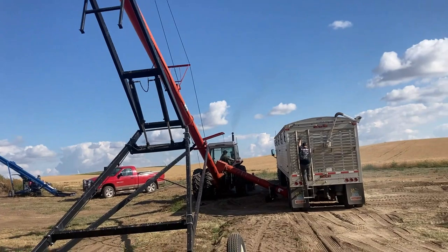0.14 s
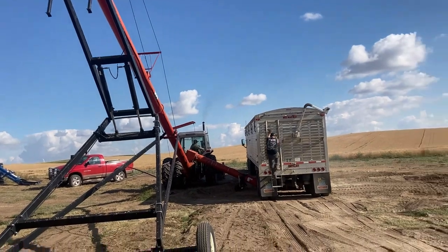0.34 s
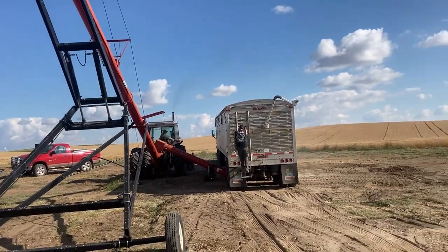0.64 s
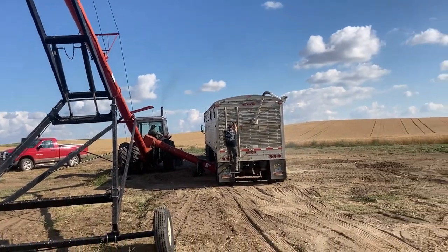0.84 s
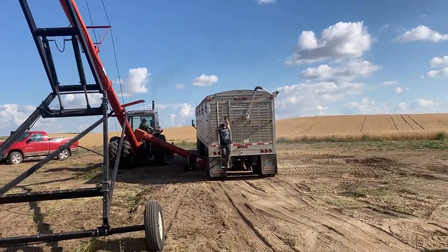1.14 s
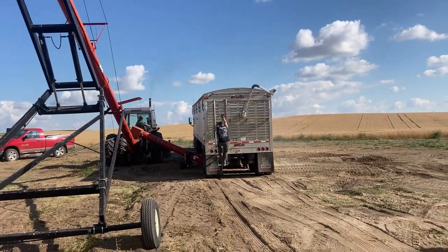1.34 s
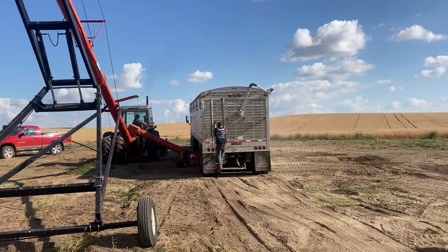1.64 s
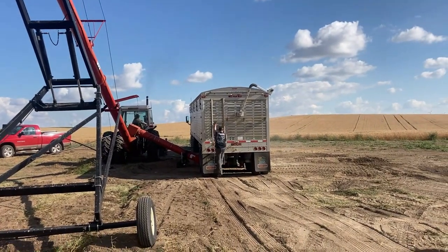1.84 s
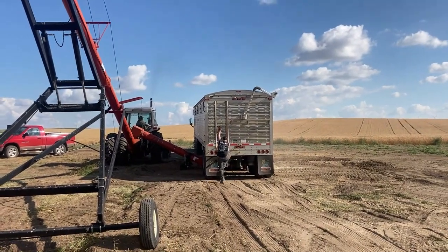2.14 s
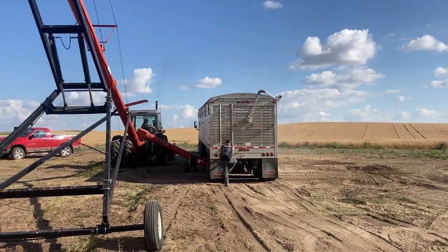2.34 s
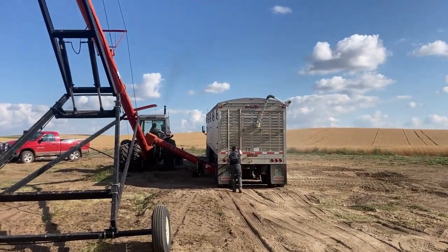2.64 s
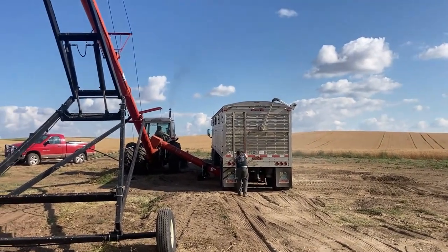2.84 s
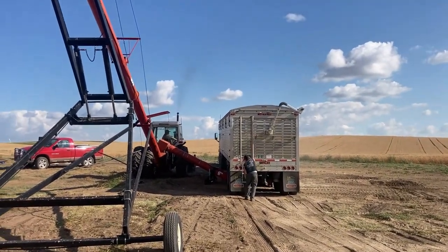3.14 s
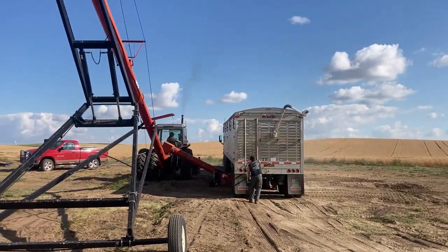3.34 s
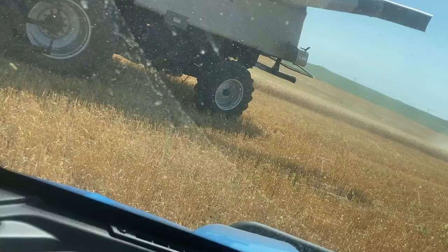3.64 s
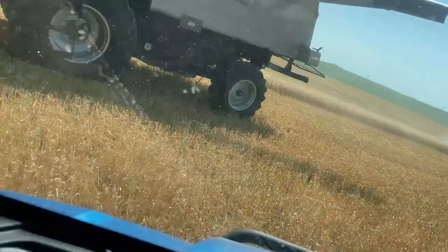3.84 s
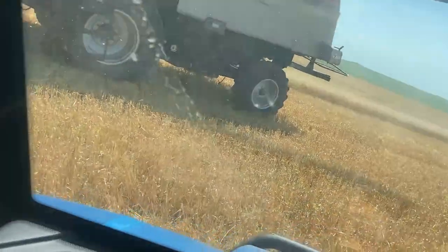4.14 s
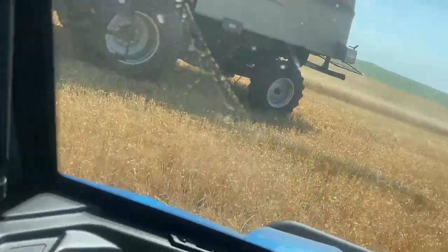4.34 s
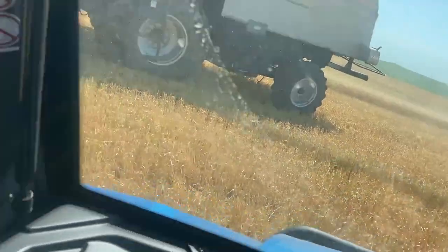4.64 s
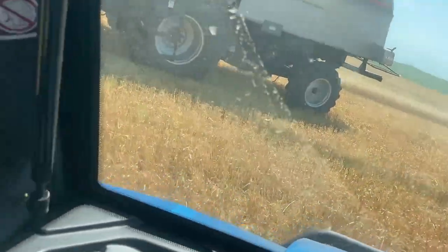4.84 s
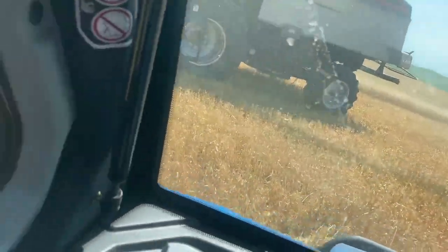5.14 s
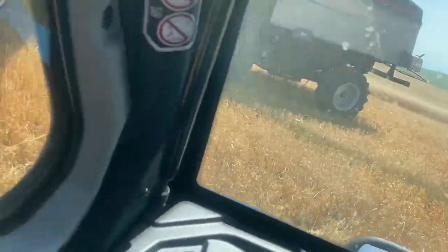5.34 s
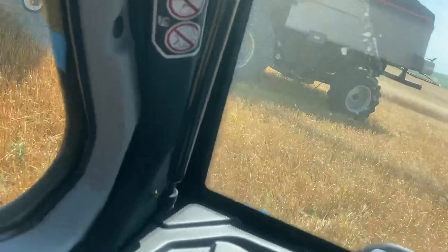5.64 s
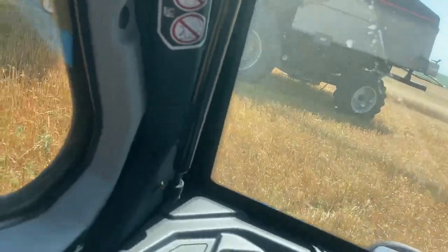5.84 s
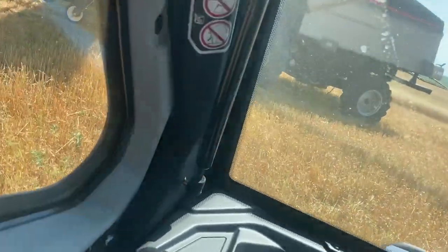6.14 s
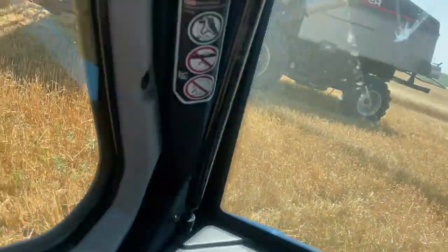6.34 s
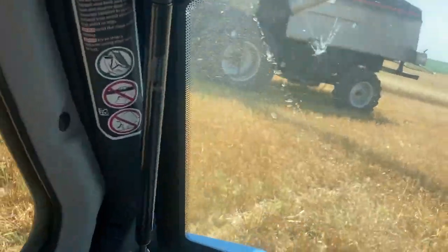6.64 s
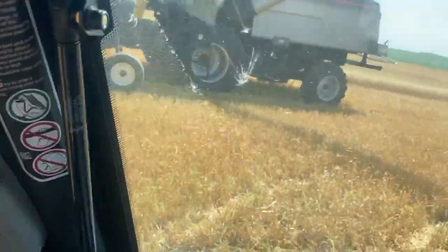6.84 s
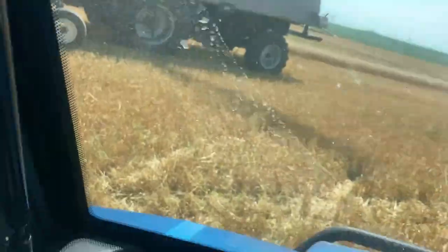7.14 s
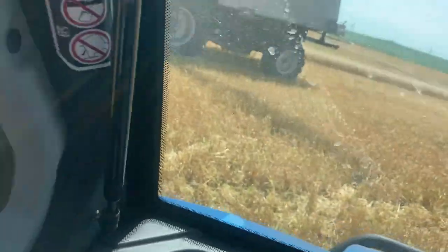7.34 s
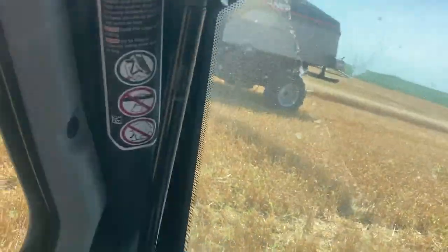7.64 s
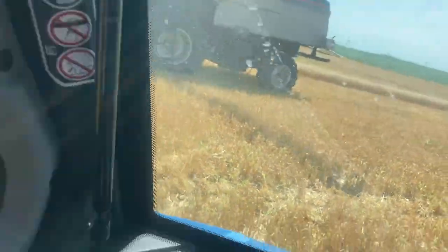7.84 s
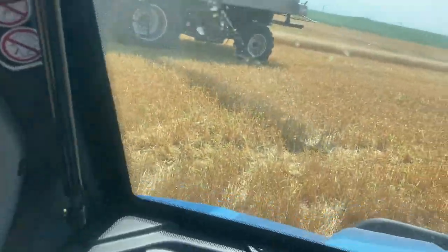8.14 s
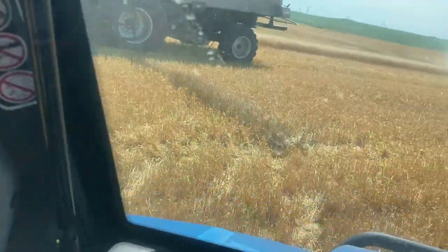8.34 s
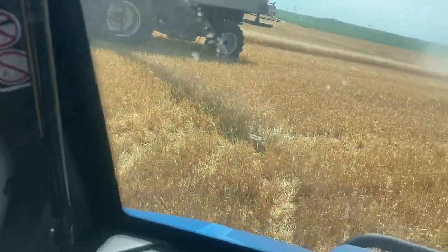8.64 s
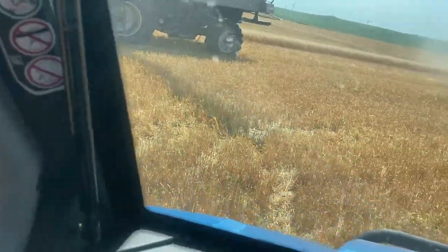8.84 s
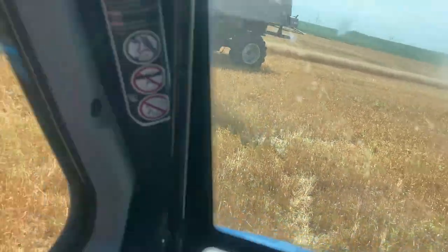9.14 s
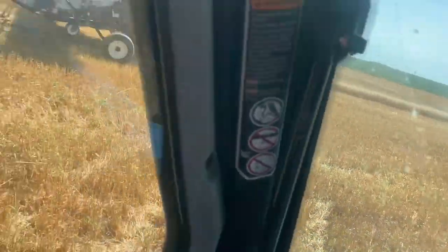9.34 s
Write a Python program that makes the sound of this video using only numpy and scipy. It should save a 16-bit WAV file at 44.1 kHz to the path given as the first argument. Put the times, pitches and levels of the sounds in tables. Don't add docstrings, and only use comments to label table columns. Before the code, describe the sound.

From 0 to about 3.7 seconds, an open farmyard: a low tractor exhaust drone with a second motor beating slowly against it, faint gear whine, and a steady broad machine roar. In front, an auger knocks about seven and a half times a second, each turn a gritty scrape and rattle of grain in a ringing steel tube. It thins near 1.7, surges at 2.0 and strengthens again before the cut. At 3.7 it switches instantly to a closed cab: a deep, bassy engine throb booms and wavers with bumps, racing most around 6.7. The harvester's steady hum grows until about 4.7 and stays, under muffled roar and faint passing whines. Light rattle at 8.0, small ticks and a faint rattle at 8.4, sharper tick at 8.7, then from 9 dust brightens the hiss, with a tick and louder trim rattles at 9.1 and another rattle at 9.4.

```python
import sys
import numpy as np
from scipy import signal
from scipy.fft import rfft, irfft, next_fast_len
from scipy.io import wavfile
from scipy.ndimage import uniform_filter1d

SR = 44100
rng = np.random.default_rng(int(sys.argv[2]) if len(sys.argv) > 2 else 0)


def boost_factor(decibels):
    exponent = np.asarray(decibels, float) / 20
    return 10 ** exponent


def dump(signal):
    limited = np.clip(np.atleast_2d(signal).T, -1, 1)
    pcm = np.round(limited * 32767).astype(np.int16)
    wavfile.write(sys.argv[1], SR, pcm)


N = 418950
T = np.arange(N) / SR
CUT_S = 3.677

# pitch_hz, level_db_rms
YARD_TONES = [(70.1, -30.5), (140.3, -29), (144.5, -33), (280.5, -37), (289.1, -51)]
BEAT_PEAK_S = 1.09
# pitch_hz, level_db_rms
GEAR_WHINE = [(1964, -52), (2557, -62)]
SHAFT = [(5, -62), (7, -53), (8, -40), (9, -41), (10, -53), (11, -49), (17, -41), (20, -41), (22, -42),
         (31, -58)]
TURN_HZ, FIRST_TURN_S, TURN_JITTER_S = 7.505, .069, 0.0042
TURN_DB, TURN_SPREAD_DB = -17.5, 1
# centre_s, extra_db
LOADS = [
    (.6, 2),
    (.86, -2.5),
    (1.54, 1),
    (1.73, -7),
    (2.0, 3.5),
    (2.87, 0.5),
    (3.06, -2),
    (3.54, 2.5),
    (3.66, 2.5),
]
LOAD_WIDTH_S = 0.1
# freq_hz, level_db_per_hz
SCRAPE = [(120, -61), (280, -57), (600, -59), (1300, -61), (2000, -62), (2800, -72), (5000, -70.5),
          (9000, -79), (15000, -83)]
# mode_hz, width_hz, gain_db
TUBE = [(242, 4.3, 3.5), (273, 30, 1.5), (305, 11, 3), (417, 49, 3.5), (490, 39, 3), (517, 28, 1),
        (603, 54, 1.5), (700, 22, 2), (1077, 126, 5), (1253, 115, 3), (1516, 180, 3.5), (2050, 45, 2),
        (4200, 1160, 1.5)]
# freq_hz, level_db_per_hz
YARD_ROAR = [(22, -72), (35, -53.5), (60, -47.5), (100, -54), (160, -48.5), (210, -55), (290, -51),
             (370, -58), (700, -56.5), (900, -62.5), (2100, -64), (2800, -69), (8500, -72), (15000, -74)]
# freq_hz, left_right_likeness, right_lead_rad
YARD_IMAGE = [(40, .9, .2), (170, .98, .1), (340, .92, -.45), (520, .85, -.8), (1300, .75, -1.2),
              (1800, .55, -2.1), (2300, .15, -2.9), (3100, .25, -4.4), (4400, .45, -6.2), (5400, .4, -8.7)]
# freq_hz, left_right_likeness, right_lead_rad
CENTRE = [(20, 1, 0), (6000, 1, -.8)]

# time_s, cycle_rate_hz
SPEED = [(3.7, 17.7), (4.0, 18.3), (4.55, 18.1), (4.95, 18.2), (5.21, 20.2), (5.45, 19.1), (5.64, 17.5),
         (5.92, 20.2), (6.32, 17.7), (6.72, 22.2), (7.0, 19.8), (7.47, 18.8), (7.7, 19.7), (7.97, 19.8),
         (8.33, 18.1), (8.95, 19.8), (9.32, 18.1), (9.5, 18.4)]
FLYWHEEL_S = .12
ENGINE = [(2, -28), (3, -21.3), (4, -21.5), (5, -15), (6, -33), (7, -30), (8, -32), (9, -34), (11, -41),
          (13, -41)]
LOW_ORDERS, LOW_LAG_RAD = 3, 1.75
MEAN_HZ, BOOM_SPAN_HZ = 19, 1.
BOOM_DB_PER_HZ, PAST_BOOM_DB_PER_HZ = 2.2, 1.6
# pitch_hz, level_db_rms
CAB_TONES = [(48.1, -37.5), (109.5, -22.5), (130.2, -34.5), (172.2, -34), (339.2, -51.5), (678.3, -54)]
ABEAM_S, NEARING_DB_PER_S = 4.72, 8
# pitch_hz, level_db_rms
STREAKS = [(365, -57), (752, -58), (848, -63), (1242, -64), (1305, -62), (1335, -62), (1595, -66),
           (1742, -65)]
# pitch_hz, level_db_rms
WHINE = [(1020, -63), (10002, -74), (15003, -73)]
# start_s, peak_db, t60_s
TICKS = [
    (8.3909, -31, 0.05),
    (8.7133, -23, 0.06),
    (9.1007, -25, 0.04),
]
# start_s, peak_db, t60_s
KNOCKS = [
    (7.9793, -25, 0.087),
    (8.4253, -30, 0.062),
    (9.1343, -19, 0.1),
    (9.436, -20.5, 0.08),
]
# freq_hz, level_db_per_hz
TICK_COLOUR = [(1500, -56), (4000, -50), (8000, -47), (11500, -42), (15500, -52)]
# freq_hz, level_db_per_hz
KNOCK_COLOUR = [(400, -48), (1300, -40), (2500, -45), (5000, -52), (15000, -70)]
# freq_hz, level_db_per_hz
CAB_ROAR = [(22, -60), (35, -48), (65, -42), (100, -45.5), (170, -45.5), (200, -53.5), (300, -57.5),
            (450, -64.5), (750, -64.5), (900, -69.5), (1600, -72.5), (2200, -73), (8500, -88), (15000, -99)]
# mode_hz, width_hz, gain_db
PANELS = [(193.5, 9.5, 3), (237, 4, 0), (364, 5.2, 2.5), (436, 9.9, 3.5), (734, 22, 4), (867, 13, 3.5),
          (1026, 30, 5), (1244, 27, 3.5), (1310, 52, 3), (1420, 38, 5), (1596, 38, 6.5), (1715, 27, 6.5),
          (2510, 100, 2.5), (4570, 1500, 2.5), (11200, 3300, 3.5)]
DUST_START_S, DUST_RISE_S, DUST_DB, DUST_MIDDLE_SHARE = 9, 0.28, 3, 0.25
# freq_hz, left_right_likeness, right_lead_rad
CAB_IMAGE = [(40, .97, .2), (170, .96, .2), (260, .84, 0.), (350, .55, .1), (450, .33, 0.), (690, .55, -.7),
             (950, .08, -.5), (1550, .35, 1.5), (2500, .22, 2.7), (4200, .2, 6.6), (5400, .25, 9.5)]

PORT_HZ, PORT_ALIGNED_HZ, PORT_CYCLE_HZ, PORT_LIKENESS = 5800, 7000, 4280, .86
# low_hz, high_hz
LOST_MID = [(8990, 9640), (13110, 13850), (15740, 22050)]
# low_hz, high_hz
LOST_SIDE = [(11040, 11710), (15150, 22050)]
# low_hz, high_hz
THINNED_MID = [(14400, 15740)]
THINNED_SHARE = .4
# low_hz, high_hz
FRAYED_MID = [(14400, 14850), (15200, 15900)]
# low_hz, high_hz
FLICKERING_MID = [(13850, 14400)]


def tractor():
    motors = tones(YARD_TONES, T - BEAT_PEAK_S, YARD_IMAGE, waver_db=0.5, start_rad=0)
    return motors + tones(GEAR_WHINE, T, CENTRE, waver_db=4.5, slip_rad=0.81)


def auger():
    times_s = np.arange(FIRST_TURN_S, CUT_S, 1 / TURN_HZ)
    chance = rng.standard_normal((40, 2))
    load_db = sum(db * np.exp(-((times_s - s) / LOAD_WIDTH_S) ** 2) for s, db in LOADS)
    turns = []
    for s, db, (late, more) in zip(times_s, load_db, chance):
        start_s = s + TURN_JITTER_S * late - .006
        turns.append((start_s, TURN_DB + db + TURN_SPREAD_DB * more + 24, .2))
    swell = bursts(turns, rise_s=.008) * boost_factor(2 * drift(60))
    struck = rng.random((2, N)) < 1500 / SR
    kernel_db = 15.5 + 3.5 * np.minimum(rng.exponential(1, (2, N)), 3)
    kernels = struck * boost_factor(kernel_db) * rng.choice([-1, 1], (2, N))
    rush = rng.standard_normal((2, N)) + 0.22 * kernels
    scrape = heard(*(rms_one(rush) * swell), SCRAPE, YARD_IMAGE, TUBE)
    return scrape + tones(SHAFT, TURN_HZ * T, YARD_IMAGE, waver_db=-0.5)


def yard_roar():
    noise = patchy(shared_db=0.0, fast_db=1.0, grain_db=0.5)
    return heard(*noise, YARD_ROAR, YARD_IMAGE, TUBE)


def engine():
    speed_hz = uniform_filter1d(np.interp(T, *np.transpose(SPEED)), int(FLYWHEEL_S * SR))
    cycles = np.cumsum(speed_hz) / SR
    cycles -= cycles[int(ABEAM_S * SR)]
    faster_hz = speed_hz - MEAN_HZ
    swell_db = BOOM_DB_PER_HZ * np.clip(faster_hz, -BOOM_SPAN_HZ, BOOM_SPAN_HZ)
    fade_db = PAST_BOOM_DB_PER_HZ * np.maximum(faster_hz - BOOM_SPAN_HZ, 0)
    low = [(k, db + swell_db) for k, db in ENGINE if k <= LOW_ORDERS]
    high = [(k, db - fade_db) for k, db in ENGINE if k > LOW_ORDERS]
    return (tones(low, cycles, CAB_IMAGE, waver_db=.7, start_rad=-LOW_LAG_RAD)
            + tones(high, cycles, CAB_IMAGE, waver_db=.7, start_rad=0))


def harvester():
    nearing = boost_factor(NEARING_DB_PER_S * np.minimum(T - ABEAM_S, 0))
    steady = nearing * tones(CAB_TONES, T - ABEAM_S, CAB_IMAGE, waver_db=1.5, start_rad=0)
    streaks = boost_factor(3) * tones(STREAKS, T, CAB_IMAGE, waver_db=5, slip_rad=3)
    return steady + streaks + tones(WHINE, T, CAB_IMAGE, waver_db=4.5)


def small_hits():
    white = rng.standard_normal((2, 2, N))
    ticks = heard(*(white[0] * bursts(TICKS, rise_s=0.00052)), TICK_COLOUR, CAB_IMAGE)
    knocks = heard(*(white[1] * bursts(KNOCKS, rise_s=0.0016)), KNOCK_COLOUR, CAB_IMAGE)
    return ticks + knocks


def cab_roar():
    dust_db = DUST_DB * np.clip((T - DUST_START_S) / DUST_RISE_S, 0, 1)
    roar = heard(*patchy(shared_db=0.37, fast_db=1.06, grain_db=1.0), CAB_ROAR, CAB_IMAGE, PANELS)
    above_400, above_4500 = [
        signal.sosfilt(signal.butter(2, hz, "high", fs=SR, output="sos"), roar) for hz in (400, 4500)]
    middle, treble = boost_factor(DUST_MIDDLE_SHARE * dust_db), boost_factor(dust_db)
    return roar + (middle - 1) * above_400 + (treble - middle) * above_4500


def tones(rows, cycles, image, waver_db, slip_rad=0.15, start_rad=None):
    out = np.zeros((2, N))
    mean_hz = (cycles[-1] - cycles[0]) / T[-1]
    for multiple, level_db in rows:
        half_lead = lead_at(multiple * mean_hz, image) / 2
        start = rng.uniform(0, 2 * np.pi) if start_rad is None else start_rad
        phase = 2 * np.pi * multiple * cycles + start + slip_rad * drift(1.54)
        level = np.sqrt(2) * boost_factor(level_db + waver_db * drift(1.9))
        out += level * np.cos(phase + half_lead * np.array([[-1], [1]]))
    return out


def bursts(rows, rise_s):
    out = np.zeros(N)
    for s, peak_db, t60_s in rows:
        age_s = np.maximum(T - s, 0)
        out += boost_factor(peak_db - 60 * age_s / t60_s) * (1 - np.exp(-age_s / rise_s))
    return out


def patchy(shared_db, fast_db, grain_db):
    out, together = 0, drift(2.8)
    white = rng.standard_normal((2, 2, N))
    edges_hz = [15, 200, 500, 1100, 2400, 5000, 9500, 19000]
    for k, (low, high) in enumerate(zip(edges_hz, edges_hz[1:])):
        band = signal.sosfilt(signal.butter(2, [low, high], "band", fs=SR, output="sos"), white[k % 2])
        flicker_db = shared_db * together + fast_db * drift(13.0) + grain_db * k / 6 * drift(180)
        out = out + band * boost_factor(flicker_db)
    return out


def heard(direct, other, spectrum, image, modes=()):
    size = next_fast_len(N)
    hz = np.fft.rfftfreq(size, 1 / SR) + 1e-3
    at, db = np.transpose(spectrum)
    peaks_db = sum(top_db / (1 + (2 * (hz - mode_hz) / width) ** 2) for mode_hz, width, top_db in modes)
    colour = boost_factor(np.interp(np.log(hz), np.log(at), db) + peaks_db) * np.sqrt(SR / 2)
    at, alike, _ = np.transpose(image)
    alike = np.clip(np.interp(hz, [*at, PORT_ALIGNED_HZ], [*alike, PORT_LIKENESS]), 0, 1)
    shared = np.sqrt((1 + alike) / 2) * rfft(direct, size)
    own = np.sqrt((1 - alike) / 2) * rfft(other, size)
    turn = np.exp(.5j * lead_at(hz, image))
    return irfft(colour * np.array([(shared + own) / turn, (shared - own) * turn]), size)[:, :N]


def lead_at(hz, image):
    at, _, lead = np.transpose(image)
    port_lead = 2 * np.pi * (hz - PORT_ALIGNED_HZ) / PORT_CYCLE_HZ
    return np.where(hz > PORT_HZ, port_lead, np.interp(hz, at, lead))


def drift(rate_hz):
    r = np.exp(-80 * np.pi * rate_hz / SR)
    slow = signal.lfilter([1], [1, -2 * r, r * r], rng.standard_normal(N // 40 + 2002))[2000:]
    return np.interp(np.arange(N) / 40, np.arange(len(slow)), rms_one(slow))


def rms_one(x):
    return x / np.sqrt(np.mean(x ** 2) + 1e-20)


def without(x, bands):
    hz, spectrum = np.fft.rfftfreq(N, 1 / SR), rfft(x)
    emptied = np.any([(hz > low) & (hz < high) for low, high in bands], axis=0)
    return irfft(spectrum * ~emptied, N)


def scene():
    inside = np.clip((T - CUT_S) / .002, 0, 1)
    yard = tractor() + auger() + yard_roar()
    cab = engine() + harvester() + small_hits() + cab_roar()
    return (1 - inside) * yard + inside * cab


def roll_off(x):
    return signal.sosfilt(signal.butter(12, 17090, fs=SR, output="sos"), x)


def record(dry):
    left, right = 1.141 * np.tanh(dry / 1.26)
    mid = without((left + right) / 2, LOST_MID)
    side = without((left - right) / 2, LOST_SIDE)
    mid = (1 - THINNED_SHARE) * mid + THINNED_SHARE * without(mid, THINNED_MID)
    for band in FRAYED_MID:
        lost = np.clip(4 * drift(9) + .3, 0, 1) * (T > CUT_S)
        mid = (1 - lost) * mid + lost * without(mid, [band])
    kept = np.clip(4 * (drift(8) - .6), 0, 1) * (T < CUT_S)
    mid = kept * mid + (1 - kept) * without(mid, FLICKERING_MID)
    return roll_off(np.array([mid + side, mid - side]))


dry = scene()
out = record(dry)
dump(out)
```